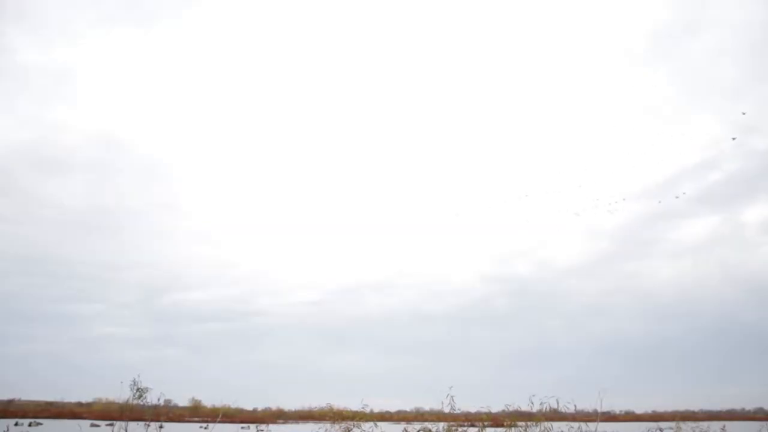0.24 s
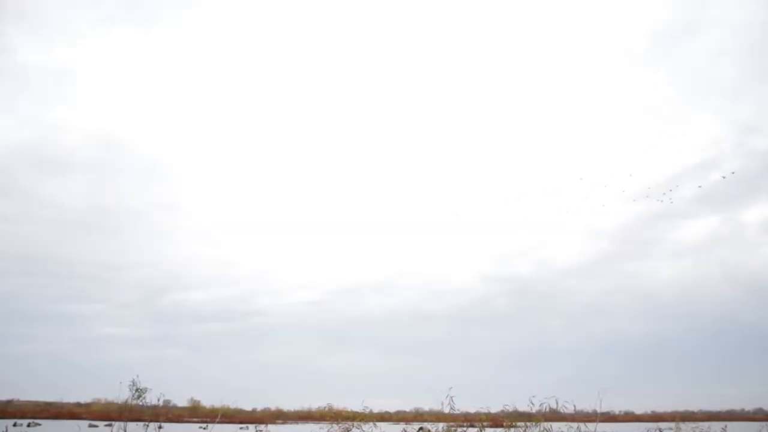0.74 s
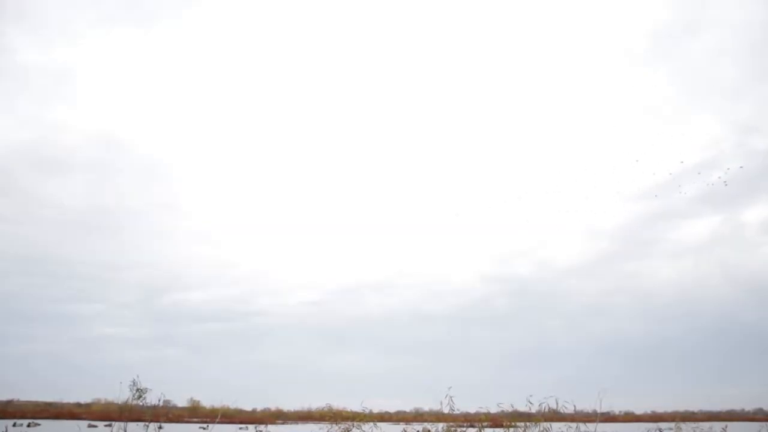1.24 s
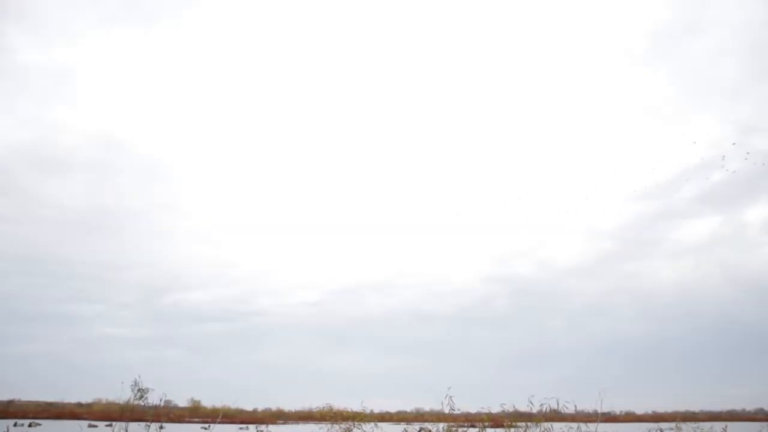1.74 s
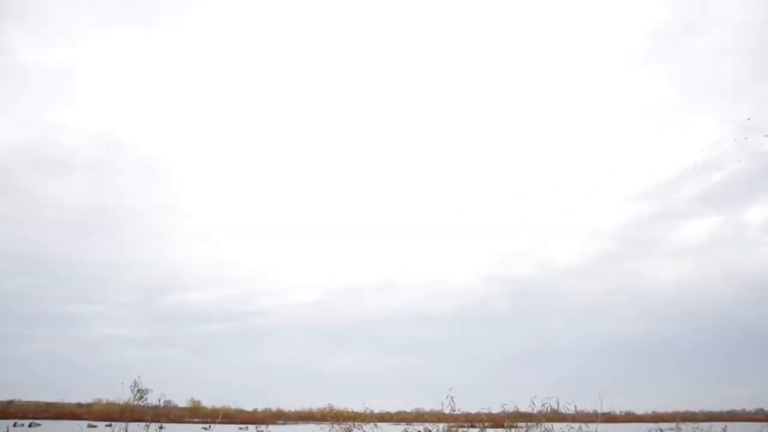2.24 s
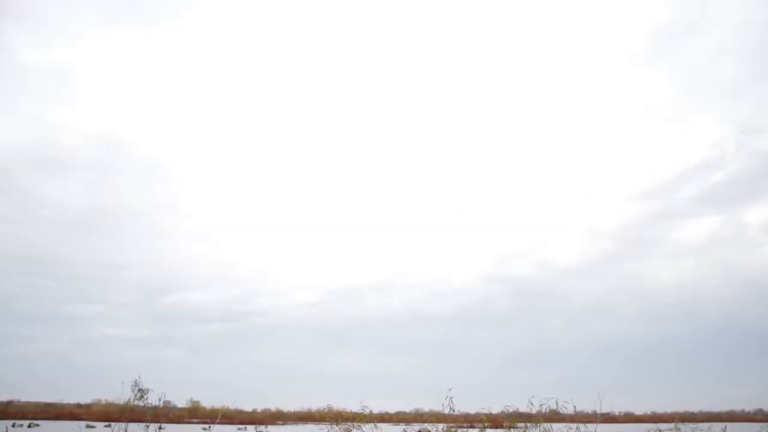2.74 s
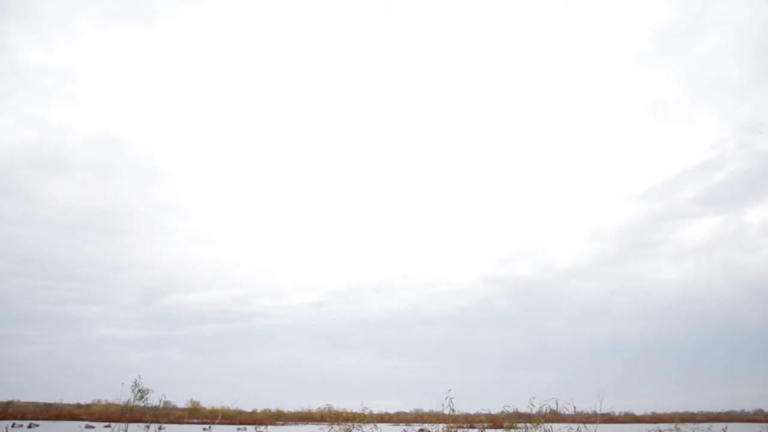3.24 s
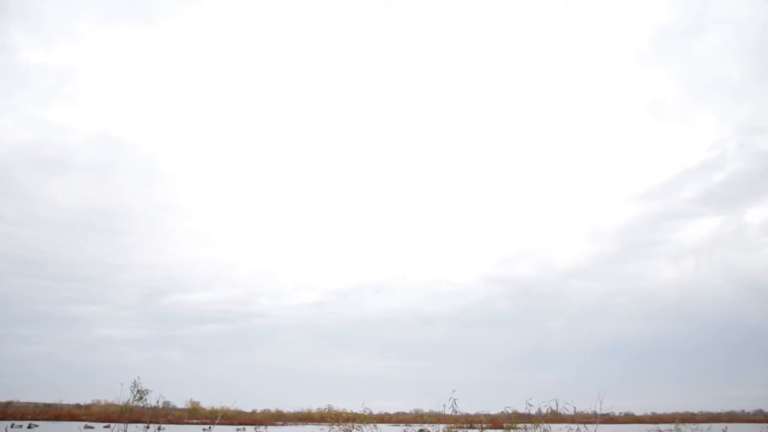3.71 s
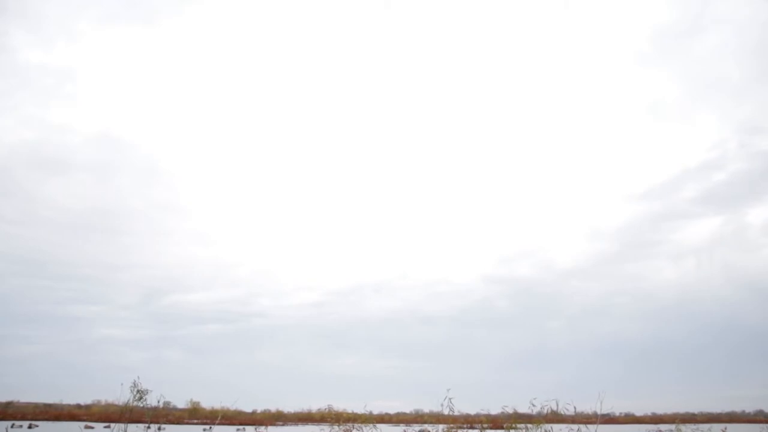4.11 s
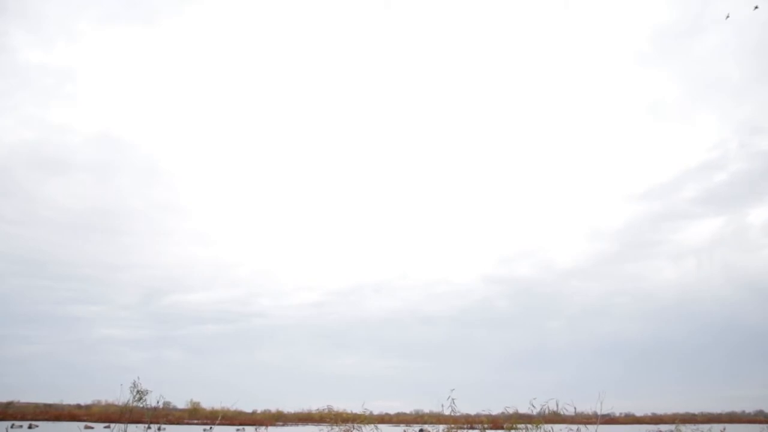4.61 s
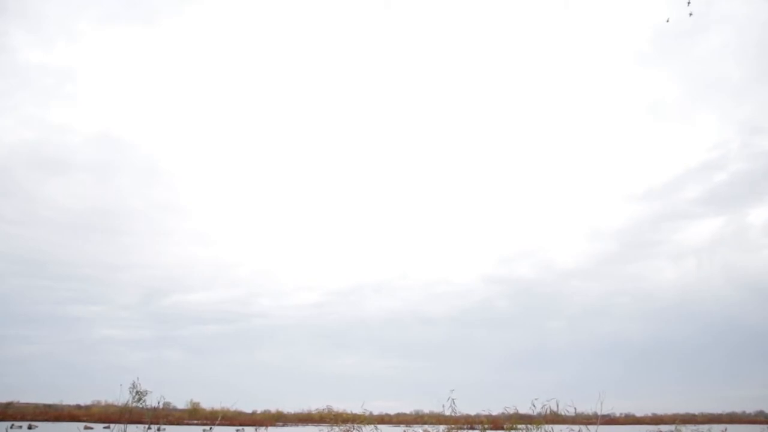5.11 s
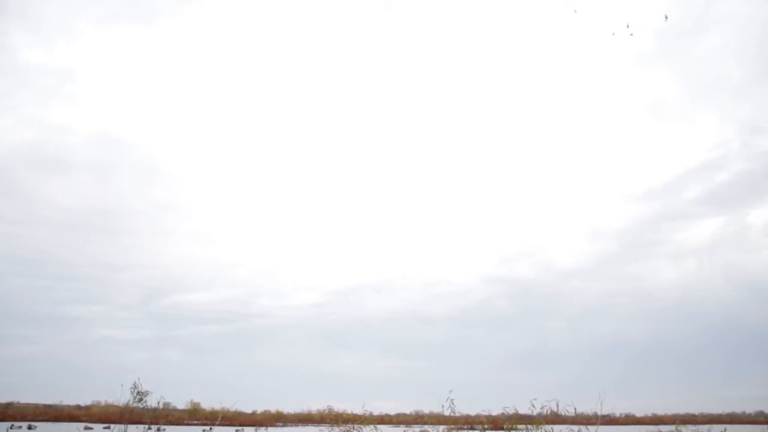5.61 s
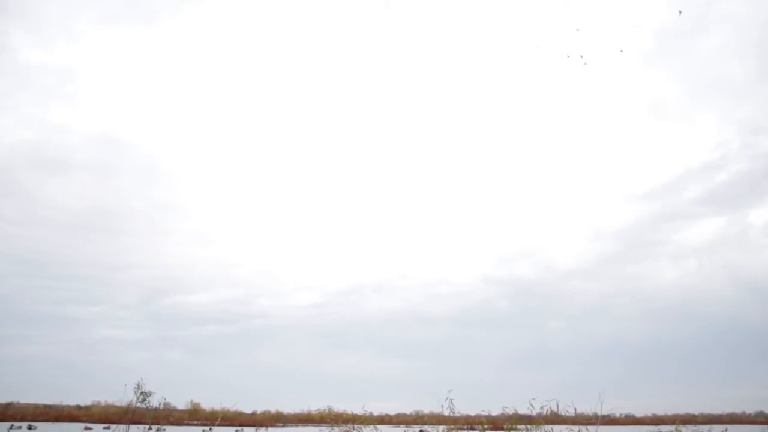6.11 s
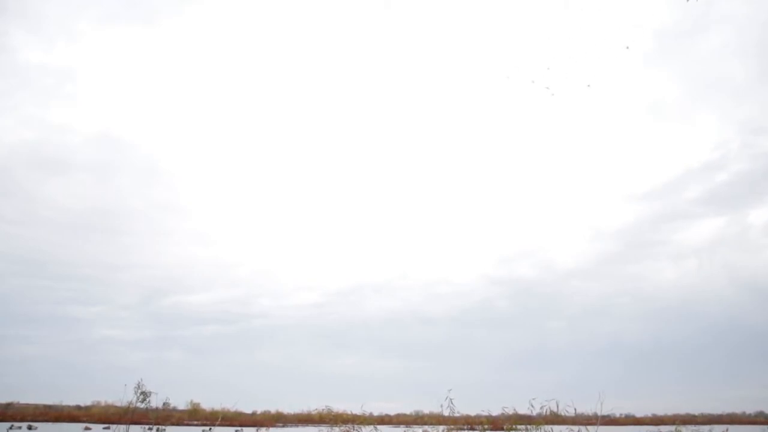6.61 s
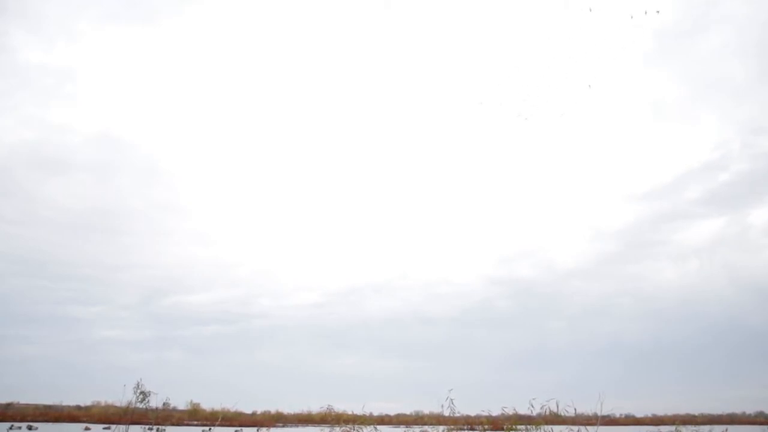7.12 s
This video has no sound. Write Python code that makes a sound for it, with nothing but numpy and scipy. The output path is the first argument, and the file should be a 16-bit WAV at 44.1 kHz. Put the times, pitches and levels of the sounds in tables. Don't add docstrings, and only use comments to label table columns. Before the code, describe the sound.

Far ducks quack briefly over a still, breezy marsh while a small drive ticks nearby; then a metal catch scrapes and clacks hard beside the microphone.

```python
import sys
import numpy as np
from scipy import signal
from scipy.io import wavfile
from scipy.ndimage import uniform_filter1d

SR = 44100
rng = np.random.default_rng(int(sys.argv[2]) if len(sys.argv) > 2 else 0)


def waveform_to_disk(signal):
    frames = np.transpose(np.atleast_2d(signal))
    scaled = np.clip(frames, -1, 1) * 32767
    samples = np.round(scaled).astype(np.int16)
    wavfile.write(sys.argv[1], SR, samples)


def boost(x):
    u = np.asarray(x, float) / 20
    return 10 ** u


N = 324311


def evened(x):
    return x / np.sqrt(np.mean(x ** 2) + 1e-20)


def read(points, hz):
    f, value = np.transpose(points)
    return np.interp(np.log(hz + 1), np.log(f + 1), value)


def curves(rows):
    s, *columns = np.transpose(rows)
    return [np.interp(np.arange(N) / SR, s, c) for c in columns]


def peak(s, rise_s, fall_s):
    t = np.arange(N) / SR - s
    return boost(-10 * np.maximum(-t / rise_s, t / fall_s))


def sides(pan_db):
    return boost(np.array([pan_db / 2, -pan_db / 2]))


def add(mix, s, sound):
    part = mix[:, round(s * SR):][:, :sound.shape[1]]
    part += sound[:, :part.shape[1]]


def band(x, lo_hz, hi_hz):
    sos = signal.butter(2, [lo_hz, min(hi_hz, SR / 2.1)], "bandpass", fs=SR, output="sos")
    return signal.sosfilt(sos, x)


def noise(colour, same, patchy_db, size):
    frames, hz = 4 * N // size + 5, np.fft.rfftfreq(size, 1 / SR)
    a, b, c, d, patches = rng.standard_normal((frames, len(hz), 5)).T
    patches = uniform_filter1d(patches, size=12, axis=0)
    patches = evened(uniform_filter1d(patches, size=8, axis=1))
    same = np.clip(read(same, hz), -1, 1)[:, None]
    left = a + 1j * b
    right = same * left + np.sqrt(1 - same ** 2) * (c + 1j * d)
    z = np.array([left, right]) * boost(read(colour, hz)[:, None] + patchy_db * patches)
    return z, hz


def heard(z):
    size = 2 * (z.shape[1] - 1)
    return evened(signal.istft(z, nperseg=size, noverlap=3 * size // 4)[1][:, :N])


def ring(hz, t60, rise_s, turn=0.):
    t = np.arange(2600) / SR
    return (1 - np.exp(-t / rise_s)) * boost(-60 * t / t60) * np.sin(2 * np.pi * (hz * t + turn))


# f/Hz, level/dB per Hz
AIR_COLOUR = [(12, -17), (20, -3.5), (107, -7), (150, -6.5), (285, -12), (319, -9.5), (434, -12),
              (949, -14.5), (2140, -17.5), (13900, -20), (16000, -21)]
# f/Hz, likeness/0..1
AIR_LIKENESS = [(60, 0.15), (240, 0.315), (950, 0.096), (3770, 0.086), (15000, 0.0093)]
# f/Hz, level/dB
AIR_LEAN = [(60, -0.47), (240, 2), (950, 1.03), (3770, -0.27), (15000, 0.3)]


def air():
    z, hz = noise(AIR_COLOUR, AIR_LIKENESS, 0.63, size=1024)
    return boost(-55) * heard(z * sides(read(AIR_LEAN, hz))[:, :, None])


# f/Hz, level/dB per Hz
WIND_SPECTRUM = [(8.8, -32), (15, 1), (52, 2.5), (97, -10), (204, -25.5), (339, -30), (368, -34),
                 (400, -36.5), (520, -61.5), (880, -120)]
# t/s, level/dB
BREEZE_LEVEL = [(0, -60.5), (2.66, -61.5), (2.76, -74), (4.4, -67), (5.7, -72), (7.35, -67)]
# peak t/s, level/dB, rise/s per 10 dB (negative: mirrored, its size is the fall), left-
# right/dB
GUST_PEAKS = [(0, -51, .1, -4.5), (.26, -53.5, 0.17, -9), (.45, -43, 0.04, -6.5), (.56, -44.5, 0.0857, -7),
              (1.02, -50, 0.02, 2), (1.11, -52, 0.06, -16), (1.24, -48, -0.0249, -1.5),
              (1.35, -46.5, 0.0458, -8.5), (1.53, -58, -0.16, -10.5), (1.62, -46.5, 0.02, -12),
              (1.82, -48, 0.0613, -10), (2.11, -47, 0.028, -11.5), (2.19, -48.5, 0.0685, -9.5),
              (2.41, -54, 0.0363, -18.5), (2.54, -53, 0.06, -8.5), (2.61, -54, 0.12, 4.5),
              (3.25, -64, -0.02, -10), (4.54, -60.5, -0.02, -6), (4.73, -59, 0.1, 3.5),
              (4.81, -60, 0.1, -6), (5.4, -55.5, 0.0245, -10.5), (5.83, -60.5, 0.11, -6.5),
              (5.94, -56, 0.0276, -14.5), (6.04, -60.5, 0.03, -6.5), (6.26, -60.5, 0.09, -1),
              (6.47, -59.5, 0.1, -3.5), (7.34, -61, 0.03, -5.5)]


def wind():
    level = boost(curves(BREEZE_LEVEL)[0]) * sides(0)[:, None]
    for s, db, rise_s, pan_db in GUST_PEAKS:
        gust = peak(s, rise_s, 1.3 * rise_s)
        level = np.hypot(level, boost(db) * sides(pan_db)[:, None] * gust)
    z, _ = noise(WIND_SPECTRUM, [(20, 0.11), (400, 0.34)], 2.56, size=2048)
    return boost(1.5) * level * heard(z)


# t/s, tick level/dB, chatter level/dB
ENGAGES = [(0.4841, -44, -49.5), (1.3571, -41.5, -49), (2.5604, -40.5, -50), (3.693, -42.5, -54),
           (4.7251, -45.5, -58)]
# t/s, tick level/dB
GEAR_RELEASES = [(0.5564, -41.5), (1.4222, -44), (2.613, -40.5), (3.7314, -42.5), (4.7645, -43.5)]


def gear_ticks():
    ticks = [(s, db, 3340) for s, db in GEAR_RELEASES]
    for s, db, chatter_db in ENGAGES:
        ticks.append((s, db, 3263))
        for k in range(3):
            at = s + (k + 1) * 0.0118 - k * 0.001545
            ticks.append((at, chatter_db - 2 * k, 3172 * (1 + 0.031 * (-1) ** k)))
    out, t60 = np.zeros((2, N)), 0.0123
    for s, db, hz in ticks:
        tick = ring(hz, t60, .0011)
        tick += .7 * ring(1.09 * hz, .6 * t60, .0011)
        tick -= .45 * ring(.87 * hz, .5 * t60, .0008)
        add(out, s, boost(db + 7.5) * tick * np.ones((2, 1)))
    return out


# t/s, level/dB, length/s
GEAR_RASPS = [(0.485, -54.5, 0.0535), (1.345, -54, 0.0674), (2.558, -57.5, 0.045), (4.75, -65.5, 0.027)]


def gear_rasp():
    out = np.zeros((2, N))
    for s, db, length in GEAR_RASPS:
        t = np.arange(0, length, 1 / SR)
        teeth = (0.96 + np.cos(np.pi * 85 * t) ** 4) * rng.standard_normal(len(t))
        swell = np.sin(np.pi * (t / length) ** 0.476)
        add(out, s, boost(db) * swell * evened(band(teeth, 1360, 3720)) * np.ones((2, 1)))
    return out


# t/s, peak level/dB, f/Hz, length/s, left-right/dB
SHELL_RINGS = [(.486, -52.5, 459, 0.0115, -2.5), (.507, -40, 451.3, 0.015, 4), (.524, -43, 437, 0.0158, 5),
               (1.366, -46.5, 457.3, 0.0377, 4.5), (1.395, -51.5, 290, 0.0153, 3),
               (2.566, -55, 520, 0.028, 0), (2.586, -43.5, 452, 0.0201, 5), (2.592, -51, 695, 0.0084, 5),
               (2.604, -48.5, 291, 0.0193, 8.5)]
# t/s, peak level/dB, f/Hz, length/s, left-right/dB
MOTOR_HUMS = [(.505, -42, 122.3, 0.118, 4.8), (1.385, -45.5, 124.7, 0.087, 2.9),
              (2.59, -44.5, 122.3, 0.065, 3.6), (3.69, -45, 121.5, 0.0378, 3.6),
              (4.725, -41.5, 119.7, 0.0476, 3.5)]


def shell_and_motor():
    out = np.zeros((2, N))
    for table, late_cycles in ((SHELL_RINGS, .03), (MOTOR_HUMS, .28)):
        for s, db, hz, length, pan_db in table:
            t = np.arange(0, length, 1 / SR)
            swell = np.sin(np.pi * (t / length) ** 0.41)
            tone = np.sin(2 * np.pi * (hz * t - np.array([[0], [late_cycles]])))
            add(out, s, boost(db) * sides(pan_db)[:, None] * swell * tone)
    return out


# t/s, peak level/dB, centre f/Hz, t60/s, left-right/dB
CATCH_SCRAPES = [(0.497, -42, 11000, 0.0147, 3.5), (2.5605, -44.5, 4500, 0.016, 3),
                 (2.561, -39, 11000, 0.0143, -0.5), (3.54, -56, 2200, 0.026, 1.5),
                 (3.572, -45.5, 2600, 0.031, 2), (3.576, -47, 8000, 0.031, 3.5),
                 (3.692, -44, 6500, 0.0213, 5.5), (3.8928, -39, 7500, 0.034, 9),
                 (3.9252, -43.5, 6500, 0.032, 4.5), (3.9406, -22, 7540, 0.0211, 10.5),
                 (3.9453, -28.5, 6000, 0.023, 4), (3.9521, -25, 5500, 0.0163, 8.5),
                 (3.9618, -28, 7000, 0.015, 11), (3.975, -26.5, 7500, 0.0216, 5),
                 (4.008, -22, 7000, 0.0153, 7), (4.018, -43, 7500, 0.023, 3.5),
                 (4.0429, -35.5, 8500, 0.02, 7), (4.0724, -47, 7500, 0.0137, 4.5),
                 (4.0951, -38, 8500, 0.029, 3), (4.1094, -42.5, 8000, 0.0186, 3),
                 (4.242, -44.5, 9000, 0.033, 6.5), (4.4781, -51.5, 4000, 0.014, .5),
                 (4.635, -45.5, 6500, 0.035, 9.5)]


def scrapes():
    out, t = np.zeros((2, N)), np.arange(2600) / SR
    for s, db, hz, t60, pan_db in CATCH_SCRAPES:
        one, other = rng.standard_normal((2, 2, len(t)))
        burst = evened(band(one[0] + 1.83 * other, 0.428 * hz, 1.56 * hz))
        decay = boost(db - 2.5 - 60 * t / t60) * (1 - np.exp(-t / 0.00078))
        add(out, s, decay * sides(pan_db)[:, None] * burst)
    return out


# t/s, peak level/dB, f/Hz, t60/s, left-right/dB
SMALL_KNOCKS = [(0.5074, -45.5, 1824, 0.0107, 3), (1.128, -47, 2120, 0.0108, 0.5),
                (1.364, -41, 1026, 0.0074, 6), (3.384, -44, 883, 0.0074, 1.5),
                (3.748, -48, 1124, 0.0173, -2.5), (3.769, -34, 627, 0.0076, 1.5),
                (3.773, -45.5, 800, 0.0075, -15.5), (3.909, -30, 2304, 0.0048, 2),
                (3.899, -50, 313, 0.06, 0), (3.945, -54.5, 190, 0.044, 1), (3.962, -34, 1147, 0.0264, 2),
                (3.985, -53.5, 216, 0.049, 4.5), (4.123, -45.5, 1303, 0.0105, -3),
                (4.472, -45.5, 904, 0.0096, -3.5), (4.75, -43, 2300, 0.0059, 4),
                (4.817, -52, 900, 0.0061, 0.5), (4.855, -48.5, 800, 0.0085, -5),
                (6.233, -47, 1863, 0.0132, 1), (7.242, -47.5, 1950, 0.01, 0.5),
                (7.244, -50.5, 2440, 0.0072, 1)]


def knocks():
    out = np.zeros((2, N))
    for s, db, hz, t60, pan_db in SMALL_KNOCKS:
        tap = ring(hz, t60, 0.000373)
        tap += .5 * ring(1.32 * hz, 0.67 * t60, 0.00023)
        tap += 0.185 * ring(0.636 * hz, t60, 0.0002)
        tap += 0.404 * ring(2.03 * hz, 0.44 * t60, 0.000176)
        add(out, s, boost(db + 5.5) * sides(pan_db)[:, None] * tap)
    return out


# t/s, peak level/dB, pulse rate f/Hz, length/s, throat f/Hz
DUCK_QUACKS = [
    (.641, -44, 150, 0.0287, 1625),
    (.832, -47.5, 168, 0.0318, 1520),
    (.892, -52, 165, 0.0184, 1400),
    (.958, -49, 182, 0.018, 1370),
]


def ducks():
    out = np.zeros((2, N))
    for s, db, rate, length, hz in DUCK_QUACKS:
        pulse = ring(hz, 0.0056, 0.00043)
        pulse += 0.3 * ring(0.41 * hz, 0.007, 0.00045)
        pulse += 0.35 * ring(1.195 * hz, 0.0045, 0.00053)
        for at in np.arange(0.2935 / rate, length, 1 / rate):
            swell = np.sin(np.pi * at / length)
            add(out, s + at, boost(db + 8.5) * swell * pulse * np.ones((2, 1)))
    return out + 0.27 * np.roll(out, 170, axis=1)


def call(rows, below_db):
    hz, db = curves(rows)
    t = np.arange(N) / SR
    waver, drift = evened(uniform_filter1d(rng.standard_normal((2, N)), size=400))
    turns = 2 * np.pi * np.cumsum(hz * (1 + 0.00775 * drift)) / SR
    on = (t > rows[0][0]) & (t < rows[-1][0])
    tone = np.sin(turns) + boost(below_db) * np.sin(turns / 2)
    return on * np.sqrt(2) * boost(db + 2.24 * waver) * tone


# t/s, f/Hz, level/dB
BIRD_WHISTLE = [(1.355, 2040, -72), (1.375, 1995, -63), (1.39, 1980, -67), (1.402, 1965, -61),
                (1.435, 1915, -63), (1.47, 1860, -71)]
# t/s, f/Hz, level/dB
LOW_MOAN = [(2.74, 470, -81), (2.85, 455, -75), (3., 430, -80.5), (3.1, 430, -78.5), (3.28, 445, -71),
            (3.4, 450, -73)]
# t/s, f/Hz, level/dB
BIRD_HOOT = [(5.76, 448.8, -76), (5.84, 485, -68.5), (6., 515, -70.5), (6.15, 504, -73.5),
             (6.24, 470, -79.5)]


def bird():
    return call(BIRD_WHISTLE, -5) + call(LOW_MOAN, -25) + call(BIRD_HOOT, -25)


# peak t/s, rise/s and fall/s per 10 dB, level/dB, bright minus dull level/dB
CLOTH_STROKES = [(3.42, 0.223, 0.3, -64, -10), (3.57, 0.093, 0.13, -64, 1.5),
                 (3.77, 0.091, 0.2565, -52, -2), (3.9, .07, 0.0952, -47.5, -9.5),
                 (3.965, 0.041, 0.0821, -50.5, 8), (4.05, 0.054, 0.3417, -58.5, 2),
                 (4.43, 0.047, 0.1645, -56.5, -15), (4.56, 0.185, 0.35, -64, 1.5),
                 (4.78, 0.097, 0.13, -60, -4.5), (5.3, 0.039, 0.09, -66, -6.5),
                 (5.4, 0.101, 0.1, -59.5, -2.5)]


def cloth():
    grain = boost(2.68 * evened(uniform_filter1d(rng.standard_normal(N), size=150)))
    one, other = rng.standard_normal((2, 2, N)) * grain
    dull = evened(band(one[0] + 0.32 * other, 243, 3175)) * sides(.7)[:, None]
    bright = evened(band(one[1] + 1.48 * other, 3030, 10650)) * sides(3.5)[:, None]
    dull_level, bright_level = np.zeros((2, N))
    for s, rise_s, fall_s, db, bright_db in CLOTH_STROKES:
        stroke = peak(s, rise_s, fall_s)
        dull_level = np.hypot(dull_level, boost(db) * stroke)
        bright_level = np.hypot(bright_level, boost(db + bright_db) * stroke)
    return dull_level * dull + bright_level * bright


# t/s, peak level/dB, left-right/dB, hold/s
CATCH_SNAPS = [
    (3.7766, -8, -.5, .0038),
    (3.9717, -13, 4.5, .0025),
    (5.0701, -2.2, 0, .0036),
]
# f/Hz, width/Hz, level/dB
COCK_MODES = [(520, 180, -15), (1039, 110, -4.5), (1783, 127, 1), (2280, 126, -4.5), (2759, 116, -2.5),
              (3128, 137, -8), (3635, 150, -6.5), (4080, 224, -6), (4630, 240, -5.5), (6150, 144, -4.5),
              (7020, 330, -6.5), (8000, 280, -8), (9830, 250, -8), (13200, 320, -14.5)]
# f/Hz, width/Hz, level/dB
SLIDE_MODES = [(1930, 260, -15), (4175, 350, -1.5), (5114, 114, -1), (5890, 150, -11), (7000, 173, -3),
               (7500, 145, -7.5), (9000, 128, -5.5), (12050, 117, -7.5), (13600, 195, -15.5)]
# f/Hz, width/Hz, level/dB
SHUT_MODES = [(763.6, 54.6, -3.5), (1865, 99, 2), (2563, 320, -8), (2856, 320, 0), (3304, 98, 1.5),
              (3898, 305, -1.5), (4760, 390, -5.5), (5650, 240, -2), (6483, 300, -5.5), (7139, 400, 0),
              (7910, 185, -9), (8846, 284, -6.5), (9690, 166, -10), (10925, 430, -14)]


def snaps():
    out, t = np.zeros((2, N)), np.arange(2600) / SR
    for (s, db, pan_db, hold), modes in zip(CATCH_SNAPS, (COCK_MODES, SLIDE_MODES, SHUT_MODES)):
        turn, skew = rng.random((len(modes), 2)).T
        body = np.zeros((2, len(t)))
        for (hz, width, mode_db), u, v in zip(modes, turn, skew):
            body *= -1
            rattle_s = 1.184 * hold * (1 + (900 / hz) ** 2)
            damped = 0.043 + 1.3 / (1 + (t / rattle_s) ** 4)
            differ = (2 * v - 1) * (hz / 7200) ** 2 * np.array([[1], [-1]])
            mode = ring(hz, 2.85 / width, 0.000311, 0.222 * u)
            mode = mode + differ * ring(hz, 1.88 / width, 0.00029, 0.402 * u + 1 / 4)
            body += boost(mode_db) * width * damped * mode
        body /= abs(body).max()
        low, high = rng.standard_normal((2, 2, len(t)))
        crack = evened(band(low[0], 1310, 5900)) + 0.45 * evened(band(high, 6600, 15300))
        body += boost(-18.5 - 60 * t / (6.13 * hold)) * crack
        add(out, s + .0007, boost(db + 1.33) * sides(pan_db)[:, None] * body)
        add(out, s, boost(db - 36.5) * body)
    tail = rng.standard_normal((2, 2000)) * boost(-35 - 60 * np.arange(2000) / SR / 0.0305)
    out = out + signal.oaconvolve(out, tail, axes=1)[:, :N]
    return band(band(out, 440, 21000), 440, 21000)


def scene():
    drive = gear_ticks() + gear_rasp() + shell_and_motor()
    marsh = air() + wind() + ducks() + bird()
    hand = scrapes() + knocks() + cloth() + snaps()
    return marsh + drive + hand


def band_limit(x):
    return signal.sosfilt(signal.butter(12, 16820, fs=SR, output="sos"), x)


def record(dry):
    edge = signal.firwin(1501, 15810, window=("kaiser", 9), fs=SR)
    limited = signal.oaconvolve(dry, edge[None], "same")
    return band_limit(limited)


dry = scene()
out = record(dry)
waveform_to_disk(out)
```